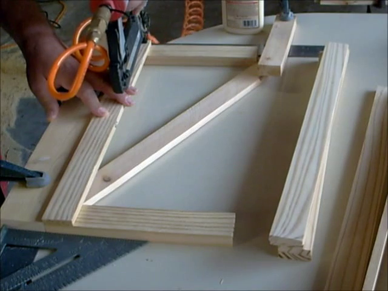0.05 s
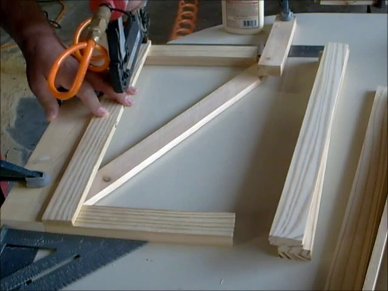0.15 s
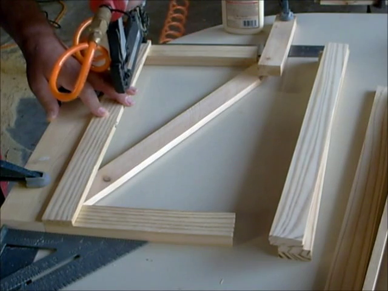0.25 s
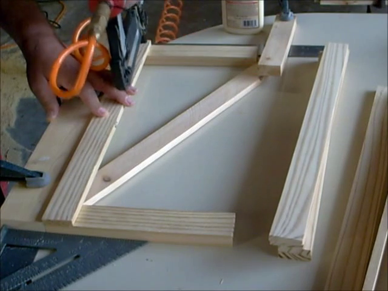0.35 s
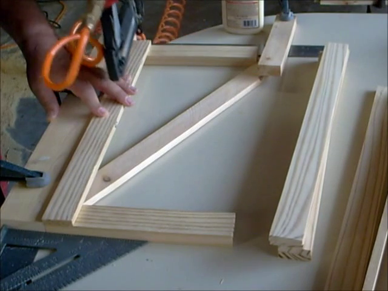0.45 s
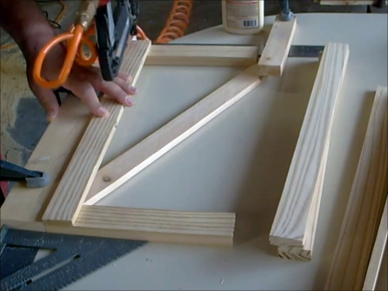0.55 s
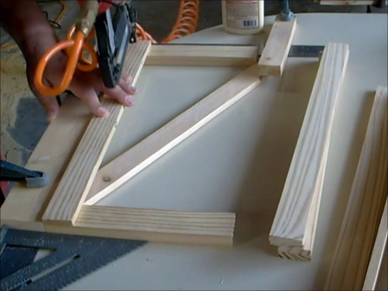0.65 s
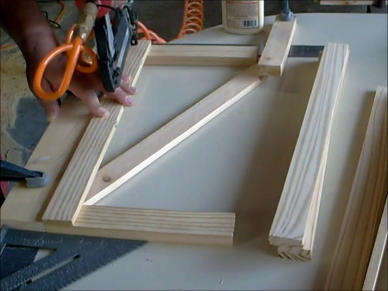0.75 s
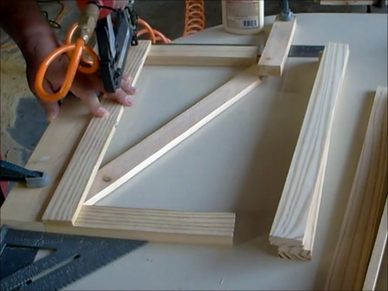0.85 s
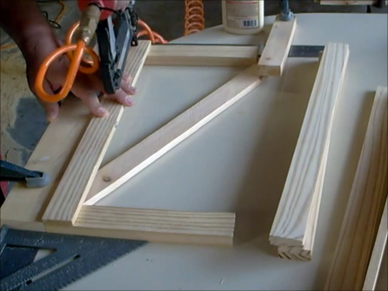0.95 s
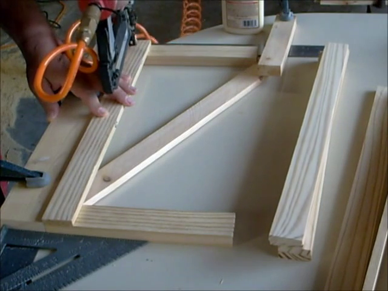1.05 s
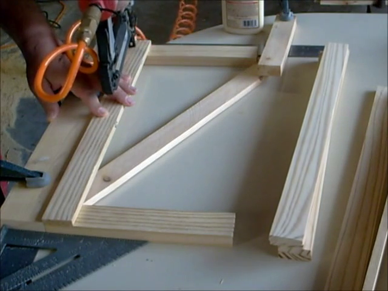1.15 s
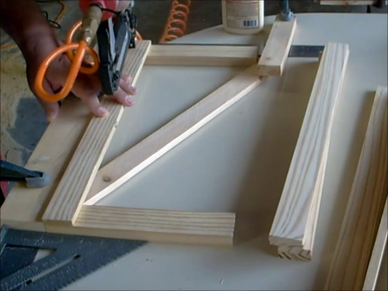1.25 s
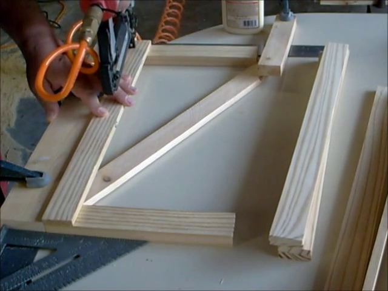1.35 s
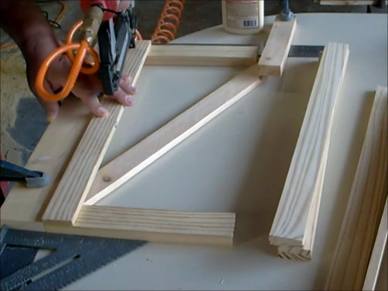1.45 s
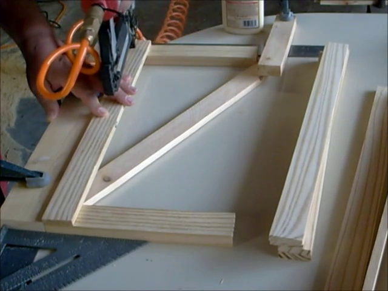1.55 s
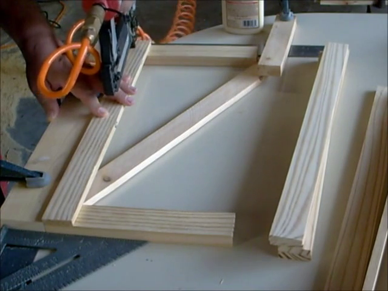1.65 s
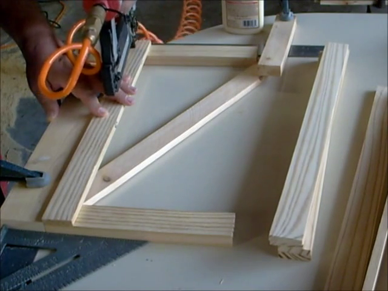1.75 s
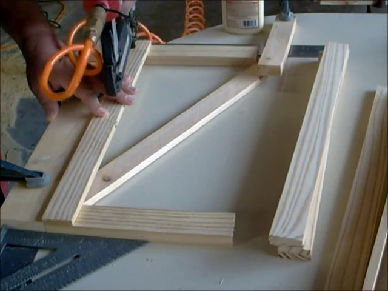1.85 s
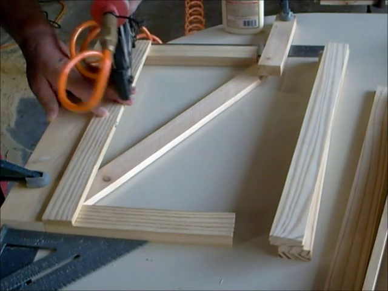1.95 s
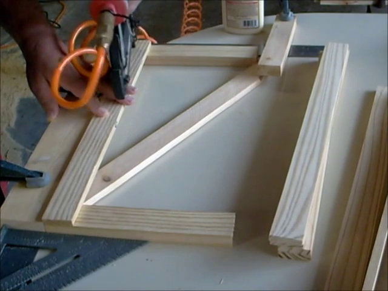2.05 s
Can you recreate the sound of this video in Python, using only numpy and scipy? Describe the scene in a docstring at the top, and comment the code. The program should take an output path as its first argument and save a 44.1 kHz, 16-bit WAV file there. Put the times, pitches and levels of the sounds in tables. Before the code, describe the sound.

Single air nail gun shot: dry click, hard crack on wood, harsh blast of air, room echo.

```python
"""A pneumatic nailer fires one brad into a wooden frame on a bench in a bare, ringing workshop.
The blow is a push ringing the wood under a crack of noise; valve hiss and exhaust are shaped noise.
Dry ticks of noise come from the trigger and tool; a noise tail rings as the room.
Behind lies a steady distant rush, with a hollow drone that swells slowly.
A small microphone adds a sharp presence peak; its converter wraps round on the highest crests."""
import sys
import numpy as np
from scipy import signal
from scipy.fft import rfft, irfft, next_fast_len
from scipy.io import wavfile
from scipy.ndimage import uniform_filter1d

SR = 44100
rng = np.random.default_rng(int(sys.argv[2]) if len(sys.argv) > 2 else 0)


def attenuation_scalar(level_db):
    """Turn a level in dB into a linear amplitude multiplier (20 dB per decade)."""
    decades = np.asarray(level_db, float) / 20
    return 10 ** decades


def persist_wave(psi):
    """Save psi, clipped to +-1, as 16-bit WAV."""
    counts = np.round(np.clip(psi, -1, 1) * 32767).astype(np.int16)
    wavfile.write(sys.argv[1], SR, np.atleast_2d(counts).T)


N = 92610
T = np.arange(N) / SR  # seconds

# Spectrum of the distant rush. Each row: frequency in Hz, level in dB.
RUSH_SPECTRUM = [(30, 28.5), (120, 17.5), (200, 0.5), (300, 0.5), (600, 1.5), (1000, 1.5), (1800, -7),
                 (2400, -8.5), (3200, -19.5), (3600, -13), (4200, -18), (6000, -17.5), (10500, -10)]
# Spectrum of the hollow drone. Each row: frequency in Hz, level in dB.
DRONE_SPECTRUM = [(120, 6), (250, -8.5), (600, -2.5), (800, 4), (1000, -5), (1200, -5.5), (1600, -14.5),
                  (2500, -27)]
# Slow swell of the drone. Each row: time in seconds, level in dB.
DRONE_SWELL = [(0, -47), (.9, -46.5), (1.4, -42), (2.1, -35.5)]
# Decay of the workshop's tail. Each row: frequency in Hz, time to fall 60 dB in seconds.
ROOM_DECAY = [(100, 0.2), (300, 0.78), (1000, 0.81), (2000, .65), (3000, 0.56), (5000, 0.62), (8000, .42),
              (11000, 0.68)]
# Ticks of trigger and tool. Each row: start in seconds, level in dB, time to fall 60 dB in seconds.
TOOL_TICKS = [(.2092, -37, .02), (1.2205, -50, .008), (1.2365, -44, .015)]
# Spectrum of the valve's hiss. Each row: frequency in Hz, level in dB.
VALVE_SPECTRUM = [(100, 4.5), (400, -5), (1500, -10), (3000, 2.5), (5500, 3.5), (8000, -2), (10300, 7)]
# Spectrum of the exhaust blast. Each row: frequency in Hz, level in dB.
EXHAUST_SPECTRUM = [(60, -14), (250, -5.5), (600, -5), (1100, 2), (1700, 3), (2300, 3.5), (3200, 2),
                    (4200, 1.5), (5200, -0.5), (8000, -7.5), (10500, -5)]
# Ringing modes of the frame. Each row: frequency in Hz, relative level in dB,
# time to fall 60 dB in seconds.
WOOD_MODES = [(280, -12.5, .015), (600, -3, .008), (1000, -1, 0.011), (1530, -2, 0.0074),
              (2300, -17.5, .01)]
# Response of the small microphone. Each row: frequency in Hz, gain in dB.
MIC_RESPONSE = [(40, -33), (150, -12.5), (260, -2.5), (500, -6), (1500, 3.5), (2400, 4), (2850, 12),
                (3150, 22.5), (3450, 9.5), (4000, 3.5), (5000, -7), (7000, -10), (10500, -17)]
# Crests that overflow the converter. Each row: centre in seconds, length in seconds,
# height over the overflow point in dB, side that overflows (-1 lower, 1 upper, 0 both).
OVERFLOW_CRESTS = [(.2455, .0018, 1.6, -1), (.2483, .0012, 1.8, 0), (.2588, .0002, .4, 1),
                   (.2883, .00032, .8, 0), (.3159, .0006, 1.2, 1), (.3227, .00032, 1.5, 1),
                   (.3344, .0006, 1.5, 0), (.3587, .00032, 1.5, -1), (.3726, .0022, 2.1, -1),
                   (.3848, .00032, 1.2, -1), (.3919, .0004, 1.2, 0), (.3998, .0004, 1.8, 0),
                   (.4017, .0005, .8, 1), (.4193, .00032, .6, 0), (.4464, .00032, .8, 0)]

BLOW_S = .2430  # the piston lands, seconds


def colour(x, table):
    """Causal minimum-phase filter through (Hz, dB) points, built by folding the cepstrum."""
    hz, db = np.array(table).T
    bins_hz = np.arange(2049) * SR / 4096
    log_gain = np.interp(np.log(bins_hz + 1), np.log(hz), db) * np.log(10) / 20
    cepstrum = irfft(log_gain)
    cepstrum[1:2048] *= 2
    cepstrum[2049:] = 0
    impulse = irfft(np.exp(rfft(cepstrum)))[:2048]
    return signal.fftconvolve(x, impulse)[:len(x)]


def noise(table):
    """Coloured noise; the table's 0 dB is the density of unit white noise."""
    return colour(rng.standard_normal(N), table)


def ramp(start_s, length_s):
    """0 before, 1 after, smooth between."""
    return np.sin(np.pi / 2 * np.clip((T - start_s) / length_s, 0, 1)) ** 2


def walk(rate):
    """Random levels held 1 / rate seconds and slewed twice."""
    hold = int(SR / rate)
    steps = np.repeat(rng.standard_normal(N // hold + 1), hold)
    return uniform_filter1d(uniform_filter1d(steps, hold), hold)[:N]


def rush():
    """Steady distant rush, and a hollow drone that swells slowly; both waver at random."""
    steady = noise(RUSH_SPECTRUM) * attenuation_scalar(-45.5 + 1.2 * walk(6))
    swell_db = np.interp(T, *np.array(DRONE_SWELL).T)
    drone = noise(DRONE_SPECTRUM) * attenuation_scalar(swell_db + 2.4 * walk(12))
    return steady + drone


def room(x):
    """Diffuse tail of noise in half-octave steps, each band with its own decay."""
    room_db, delay_s = 1, .011
    age = np.arange(SR) / SR
    spectrum = rfft(rng.standard_normal(SR))
    hz = np.arange(SR // 2 + 1) + 1.
    decay_hz, decay_s = np.array(ROOM_DECAY).T
    tail = 0
    for mid_hz in 45 * 2 ** (np.arange(17) / 2):
        t60 = np.interp(np.log(mid_hz), np.log(decay_hz), decay_s)
        band = np.clip(1 - 2 * np.abs(np.log2(hz / mid_hz)), 0, 1)
        tail = tail + irfft(spectrum * band) * attenuation_scalar(-60 * age / t60)
    tail = tail * (age > delay_s)
    tail = tail / np.sqrt(np.sum(tail ** 2))  # unit energy
    return attenuation_scalar(room_db) * signal.fftconvolve(x, tail)[:N]


def ticks():
    """Small dry clicks of metal parts: noise that starts at once and dies exponentially."""
    grit = rng.standard_normal(N)
    clicks = np.zeros(N)
    for start_s, db, t60 in TOOL_TICKS:
        decay = attenuation_scalar(-60 * np.maximum(T - start_s, 0) / t60)
        clicks += attenuation_scalar(db) * grit * (T >= start_s) * decay
    return clicks


def valve():
    """Bright, sputtering air rushes into the cylinder until the piston lands."""
    start_s, rise_s, start_db, sag_db_per_s = .2178, .004, -14, 750
    sputter_db = 3 * walk(500)
    db = start_db - sag_db_per_s * np.abs(T - start_s) + sputter_db
    landing = 1 - ramp(BLOW_S, 0.0027)
    return noise(VALVE_SPECTRUM) * ramp(start_s, rise_s) * attenuation_scalar(db) * landing


def exhaust():
    """The cylinder vents: fast rise, sagging hold, short release."""
    start_s, rise_s, end_s, fall_s = .2560, .002, 0.47, 0.04
    start_db, sag_db_per_s = -17, 19
    shape = ramp(start_s, rise_s) - ramp(end_s, fall_s)
    flutter_db = -0.5 * walk(40)
    db = start_db - sag_db_per_s * (T - start_s) + flutter_db
    return noise(EXHAUST_SPECTRUM) * shape * attenuation_scalar(db)


def blow():
    """A short push rings the frame's modes, with a crack of noise on top."""
    push_s, blow_db = .0007, 1.5
    crack_db, crack_s = -18, .005  # the crack starts to fade crack_s after the blow
    age = np.arange(SR // 5) / SR
    ring = sum(attenuation_scalar(db - 60 * age / t60) * np.cos(2 * np.pi * hz * age) for hz, db, t60 in WOOD_MODES)
    push = ramp(BLOW_S, push_s) - ramp(BLOW_S + push_s, push_s)
    # the slope of the push drives the wood
    thud = signal.fftconvolve(np.gradient(push), ring)[:N] * -attenuation_scalar(blow_db)
    crack_shape = ramp(BLOW_S + push_s, 0.0019) - ramp(BLOW_S + crack_s, 0.0027)
    return thud + attenuation_scalar(crack_db) * rng.standard_normal(N) * crack_shape


def scene():
    """Every source direct, then the workshop's tail, over the background."""
    small, hit, air = ticks(), blow(), valve() + exhaust()
    echo = room(air + attenuation_scalar(-5) * hit + attenuation_scalar(-3.5) * small)  # sends to the room in dB
    return (small + hit + air + echo + rush())[None]


def low_pass(x):
    """Removes everything above the highest recorded frequency."""
    return signal.sosfilt(signal.butter(12, 10780, fs=SR, output="sos"), x)


def record(dry):
    """Presence peak and hiss; listed crests swell past overflow and wrap at half rate; other peaks clip."""
    hiss_db, overflow = -73.5, .82  # overflow as a fraction of full scale
    rise_s, fall_s = .0012, .0018  # swell into and out of each crest
    x = colour(dry[0], MIC_RESPONSE) + attenuation_scalar(hiss_db) * rng.standard_normal(N)

    # the presence band, and the same wave evened out to unit height
    band = signal.butter(1, (2500, 3900), "bandpass", fs=SR, output="sos")
    ring = signal.sosfiltfilt(band, x)
    envelope = np.abs(signal.hilbert(ring, next_fast_len(N))[:N])
    wave = ring / (envelope + 1e-9)

    up, down = np.zeros(N, bool), np.zeros(N, bool)
    for centre_s, length_s, db, side in OVERFLOW_CRESTS:
        start_s, end_s = centre_s - length_s / 2, centre_s + length_s / 2
        hump = ramp(start_s - rise_s, rise_s) - ramp(end_s, fall_s)
        x = x + hump * (overflow * attenuation_scalar(db) * wave - ring)
        inside = np.abs(T - centre_s) < length_s / 2
        up = up | inside & (side >= 0)
        down = down | inside & (side <= 0)

    # at half rate, crests past the overflow point jump to the opposite side
    x = signal.resample_poly(x, 1, 2, window=("kaiser", 9))
    over = up[::2] & (x > overflow)
    under = down[::2] & (x < -overflow)
    x = x - 2 * overflow * (over * 1. - under)
    smoothing = signal.firwin(61, 10500, fs=SR, window=("kaiser", 9))
    x = np.clip(signal.resample_poly(x, 2, 1, window=smoothing), -1, 1)
    return low_pass(x[None, :N])


dry = scene()
out = record(dry)
persist_wave(out)
```